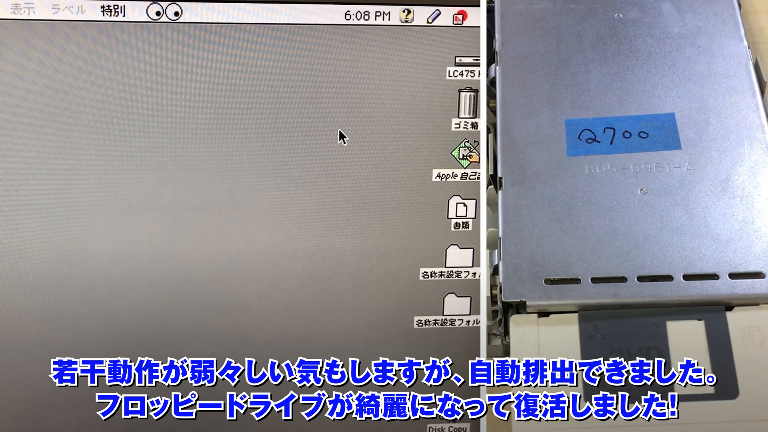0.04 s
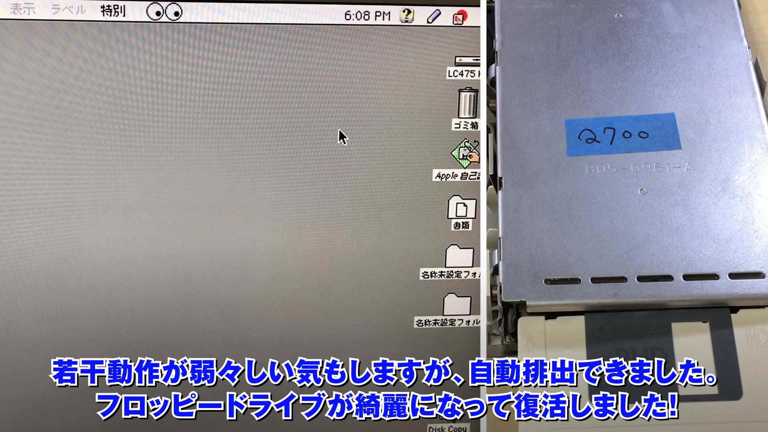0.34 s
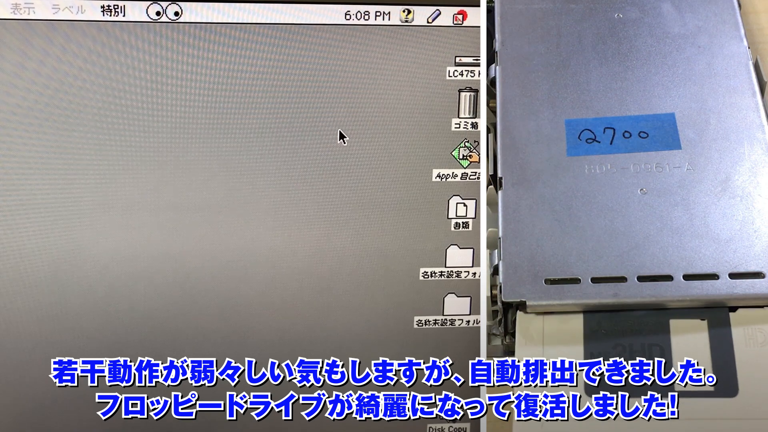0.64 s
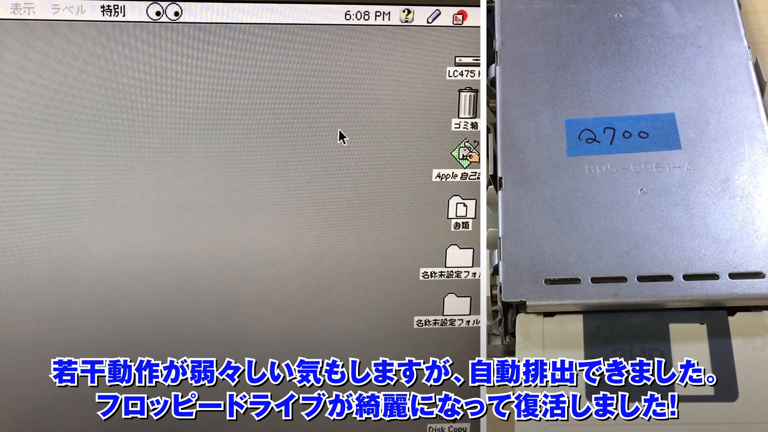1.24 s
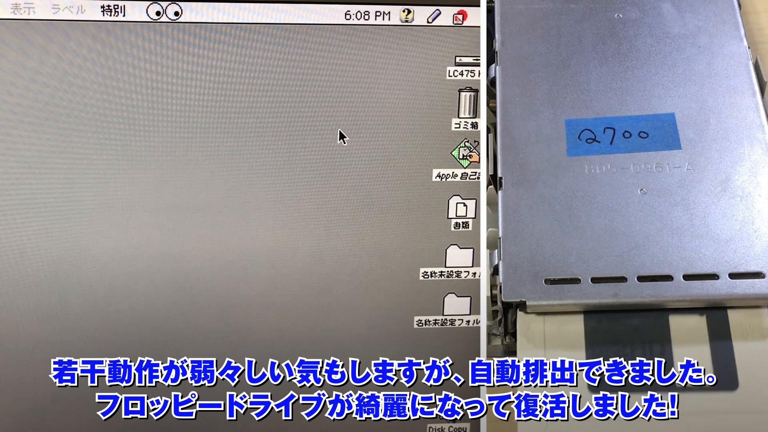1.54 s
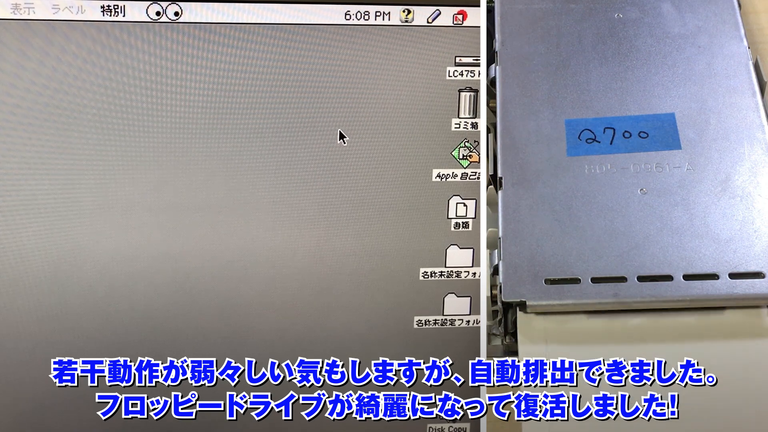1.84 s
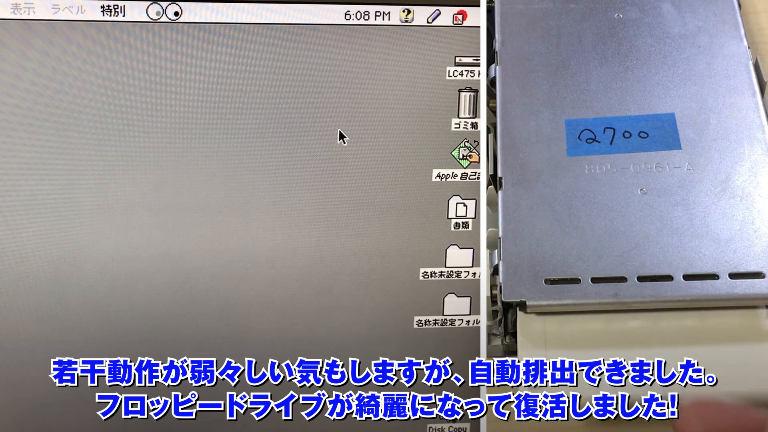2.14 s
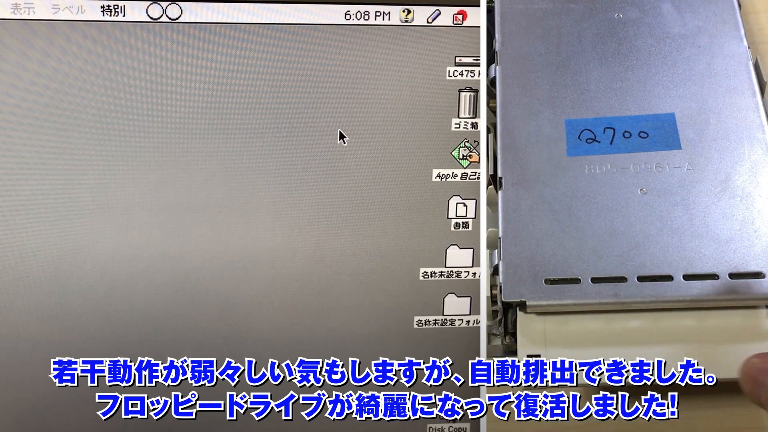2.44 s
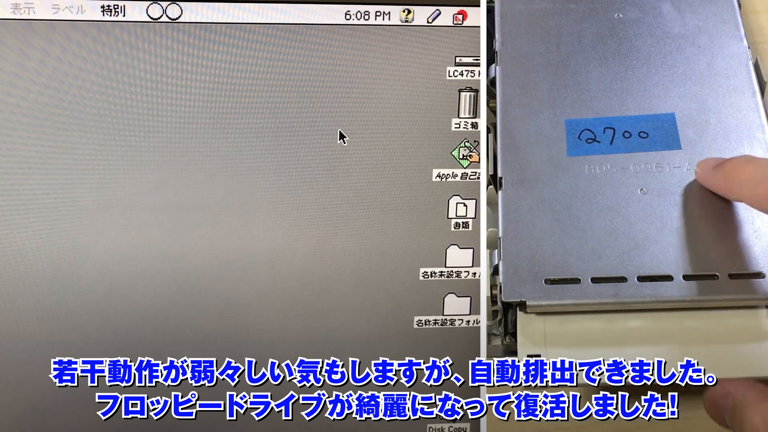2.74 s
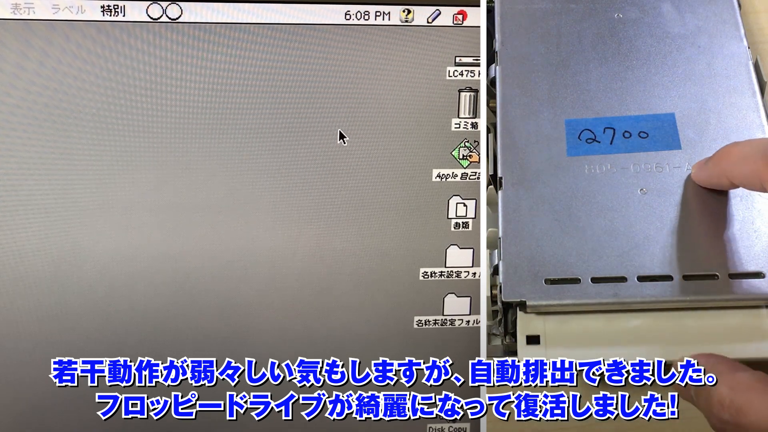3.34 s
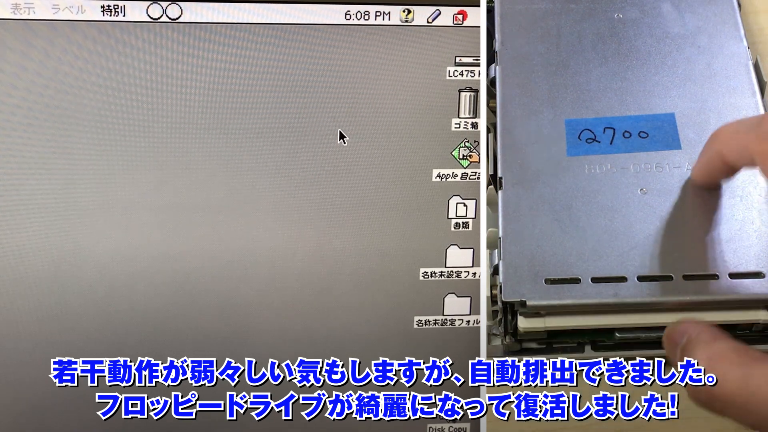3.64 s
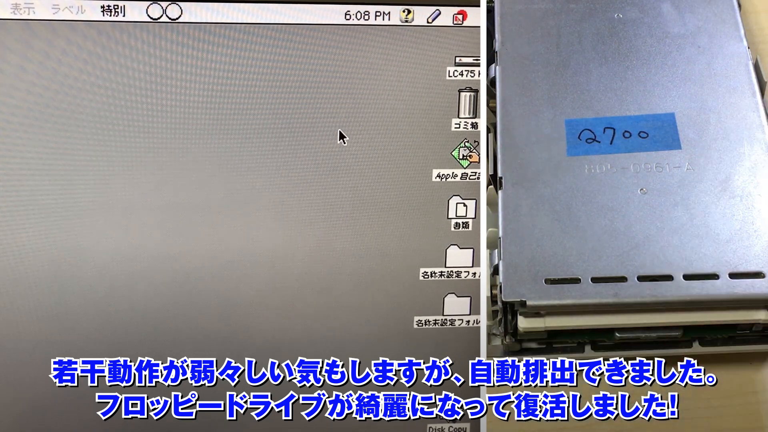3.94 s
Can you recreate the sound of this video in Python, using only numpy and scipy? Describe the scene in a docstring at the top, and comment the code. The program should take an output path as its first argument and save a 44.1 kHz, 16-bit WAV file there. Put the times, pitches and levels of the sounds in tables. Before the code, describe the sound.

Close up indoors, over a steady computer fan, a floppy disk rubs and clicks its way into a drive. It snaps home with a loud, briefly ringing clunk, and a faint motor buzz starts at the very end.

```python
"""A cooling fan hums throughout in a running computer, on which lies a bare metal drive, heard close up.
A floppy disk is slid in: its shell rubs along the guides and ticks past the shutter lever, while disk
and hand knock dully on the case. Pushed home at about 3.5 s, it trips the latch, and the carriage slams
down and sets the steel frame ringing. The case booms, and at the very end the head motor starts to buzz."""
import sys
import numpy as np
from scipy import signal
from scipy.fft import rfft, irfft
from scipy.io import wavfile

SR = 44100
rng = np.random.default_rng(int(sys.argv[2]) if len(sys.argv) > 2 else 0)


def dump_mix(stems):
    """Bounce the given channels to the path in sys.argv[1] as a 16-bit WAV at rate SR."""
    frames = np.atleast_2d(stems).T  # one column per channel
    limited = np.clip(frames, -1, 1)  # hard clip at full scale
    pcm = np.round(limited * 32767).astype(np.int16)
    wavfile.write(sys.argv[1], SR, pcm)


N = 176400

# Coherence of the drive's sound. Each row: frequency in Hz, left-right correlation from 0 to 1.
DRIVE_COHERENCE = [(100, .95), (450, .87), (800, .9), (1500, .8), (3000, .76), (7000, .73), (12000, .76)]
# Spectrum of the plastic shell on steel. Each row: frequency in Hz, relative density in dB.
SHELL_SPECTRUM = [(200, -13), (1000, -9), (1900, -3), (2450, 3), (3200, -0.5), (4300, -5), (6700, -9),
                  (8000, -13), (12000, -17.5), (15500, -29)]


def amp(db):
    """Amplitude grows tenfold for every 20 dB."""
    return 10 ** (np.asarray(db) / 20)


def unit(x):
    """Normalisation to an rms of 1."""
    return x / np.sqrt(np.mean(x ** 2) + 1e-20)


def at_frequency(points, hz):
    """Interpolation of a table on a logarithmic frequency axis."""
    table_hz, value = np.transpose(points)
    return np.interp(np.log(hz + 1), np.log(table_hz + 1), value)


def contour(points):
    """Linear interpolation of (seconds, value) points over the whole scene."""
    return np.interp(np.arange(N) / SR, *np.transpose(points))


def add(mix, start_s, sound):
    """Superposition: a stereo sound sums into the mix from its start time."""
    part = mix[:, max(round(start_s * SR), 0):][:, :sound.shape[1]]
    part += sound[:, :part.shape[1]]


def drift(cutoff_hz):
    """Low-pass filtered noise gives a slow random fluctuation of rms 1."""
    hz = np.fft.rfftfreq(N, 1 / SR)
    return unit(irfft(rfft(rng.standard_normal(N)) / (1 + (hz / cutoff_hz) ** 4), N))


def colour(pair, spectrum, tilt_db=0, coherence=DRIVE_COHERENCE, balance=None):
    """Sum and difference of two independent signals give partly coherent stereo, filtered to a spectrum."""
    # The drive's balance, used by default. Each row: frequency in Hz, left minus right in dB.
    drive_balance = [(60, -1.5), (92, 1), (140, -5), (210, -0.55), (330, 3), (500, 3), (770, -1.5),
                     (1170, -1.55), (1790, -1.0), (2740, -0.5), (4190, -0.5), (6410, 1.5), (9810, 0.0),
                     (15000, -1.5)]
    n = pair.shape[1]
    hz = np.fft.rfftfreq(n, 1 / SR)
    correlation = np.clip(at_frequency(coherence, hz), -1, 1)
    lean = amp(at_frequency(balance or drive_balance, hz) / 2)
    first, second = rfft(pair)
    common, apart = first * np.sqrt(1 + correlation), second * np.sqrt(1 - correlation)
    stereo = np.array([(common + apart) * lean, (common - apart) / lean])
    octaves = np.log2(np.maximum(hz, 600))  # the tilt acts above 600 Hz
    return unit(irfft(stereo * amp(at_frequency(spectrum, hz) + tilt_db * octaves), n))


def decay(t, t60):
    """Damping: free vibration falls exponentially, by 60 dB in t60 seconds."""
    return np.exp(-np.log(1000) * t / max(t60, 1e-3))


def ring(spectrum, t60, rise_s, tilt_db=0):
    """Modal overlap: a dense cluster of modes, struck once, sounds as a decaying burst of noise."""
    t = np.arange(SR // 5) / SR
    envelope = np.minimum(t / rise_s, 1) * decay(t, t60)
    noise = colour(rng.standard_normal((2, len(t))), spectrum, tilt_db)
    return unit(noise * envelope) * np.sqrt(np.mean(envelope ** 2))


def resonate(x, hz, width_hz):
    """Resonance selects a band about a fixed or moving frequency; the result has rms 1."""
    carrier = np.exp(2j * np.pi * np.cumsum(hz * np.ones(N)) / SR)
    pole = np.exp(-np.pi * width_hz / SR)
    baseband = signal.lfilter([1], [1, -2 * pole, pole * pole], x / carrier)
    return unit((carrier * baseband).real)


def room(x):
    """Reverberation: a short diffuse tail builds up, and each band decays at its own rate."""
    # Each row: frequency in Hz, reverberation time in seconds.
    decay_times = [(100, 0.1), (700, 0.1), (2500, 0.22), (7000, 0.21), (14000, 0.17)]
    build_up_s = 0.017
    noise = colour(rng.standard_normal((2, SR // 2)), [(20, 0), (20000, 0)])
    hz, t, bands = signal.stft(noise, SR, nperseg=256)
    damping = np.exp(-np.log(1000) * t / at_frequency(decay_times, hz)[:, None])
    tail = signal.istft(bands * damping, SR, nperseg=256)[1]
    tail *= np.minimum(np.arange(tail.shape[1]) / SR / build_up_s, 1) ** 2
    return signal.fftconvolve(x, tail / np.linalg.norm(tail[0]), axes=1)[:, :N]


def fan():
    """Rushing air makes broadband noise; rotation adds blade and motor tones that waver together."""
    # Spectrum of the airflow. Each row: frequency in Hz, relative density in dB.
    air_spectrum = [(25, -15), (60, -13.5), (113, -13), (170, -15), (260, -14), (340, -17.5), (420, -15.5),
                    (475, -11), (590, -19), (672, -1.5), (834, -0.5), (1040, -11), (1360, -17.5),
                    (1510, -11), (1780, -17), (2090, -15), (2260, -20), (2800, -22.5), (3500, -26),
                    (4690, -31.5), (6000, -29.5), (7830, -32), (10300, -37.5), (11300, -34), (11900, -30),
                    (12400, -34), (15800, -44)]
    # Blade and motor tones. Each row: frequency in Hz, level in dB.
    tones = [(370.4, -56.5), (479, -70), (818.5, -63.5), (1110, -69), (1269.8, -60), (1481.4, -63),
             (1693, -65.5), (1904.7, -73), (2116.4, -66.5), (7989, -84), (11795, -80), (12010, -77.5)]
    # Each row: frequency in Hz, left-right correlation from 0 to 1.
    coherence = [(60, .72), (160, .65), (270, .84), (500, .95), (760, .97), (1200, .92), (2000, .93),
                 (3300, .84), (5500, .74), (9000, .79), (15000, .85)]
    # Each row: frequency in Hz, left minus right in dB.
    balance = [(60, -0.5), (180, -0.5), (550, -1.5), (1650, -1.0), (4970, -2), (15000, 0.5)]
    air_db, air_flutter_db, tone_flutter_db, speed_waver = -48, 0.52, 0.2, 0.0005
    out = colour(rng.standard_normal((2, N)), air_spectrum, coherence=coherence, balance=balance)
    out *= amp(air_db + air_flutter_db * drift(cutoff_hz=15))
    rotor_time = np.cumsum(1 + speed_waver * drift(cutoff_hz=3)) / SR
    for hz, db in tones:
        lean = amp(at_frequency(balance, hz) * np.array([[.5], [-.5]]))
        peak = np.sqrt(2) * amp(db + tone_flutter_db * drift(cutoff_hz=6))
        out += lean * peak * np.sin(2 * np.pi * (hz * rotor_time + rng.random()))
    return out


def head_motor():
    """Periodic excitation: even steps make a harmonic buzz, with a small rattle at each step."""
    # Each row: multiple of the step rate, level in dB.
    harmonics = [(1, -49), (4, -51.5), (5, -56), (6, -46.5), (7, -60), (13, -59.5), (15, -59)]
    step_hz, start_s, rise_s, rattle_db = 178.8, 3.925, 0.037, -56
    t = np.arange(N) / SR
    buzz = sum(np.sqrt(2) * amp(db) * np.sin(2 * np.pi * (k * step_hz * t + rng.random()))
               for k, db in harmonics)
    pulses = np.exp(-(t * step_hz % 1) / .25)
    rattle = colour(rng.standard_normal((2, N)) * pulses, SHELL_SPECTRUM, tilt_db=-2.0)
    return (buzz + amp(rattle_db) * rattle) * np.clip((t - start_s) / rise_s, 0, 1)


def case():
    """Enclosure resonance: each knock gives a thud and a hollow ring; a low boom swells and fades."""
    # Knocks of disk and hand. Each row: start in seconds, thud level in dB, hollow ring level in dB.
    knocks = [(0.002, -52, -35.5), (0.103, -57, -40.5), (0.24, -54, -41.5), (1.752, -46, -41.5),
              (1.938, -41, -37), (2.03, -37.5, -42), (2.134, -45.5, -33), (2.2, -42.5, -45),
              (2.893, -46, -54), (2.922, -51, -41), (2.975, -49.5, -42), (3.474, -50, -42),
              (3.497, -52, -62), (3.529, -40.5, -23.5), (3.568, -26, -18), (3.597, -31.5, -42.5),
              (3.93, -50.5, -37)]
    # Spectra of thud and hollow ring. Each row: frequency in Hz, relative density in dB.
    thud_spectrum = [(20, -32), (40, -17.5), (62, -10.5), (95, -8.5), (135, 2), (175, -5), (228, -1),
                     (340, -13.5), (600, -28), (2000, -55)]
    hollow_spectrum = [(100, -35.5), (300, -27.5), (570, -29.5), (690, 6), (860, -2), (1200, -12),
                       (2500, -22.5), (8000, -47.5)]
    # Envelope of the boom. Each row: time in seconds, relative level in dB.
    boom_levels = [(0.0, -70), (0.24, -57.5), (1.08, -84), (1.15, -64), (1.64, -73), (2.05, -64),
                   (2.1, -53), (2.27, -46.5), (2.83, -71), (3.11, -53.5), (3.21, -57), (3.27, -68),
                   (3.46, -67), (3.59, -46.5), (3.63, -50), (3.71, -37.5), (3.84, -44.5), (4.0, -48)]
    boom_hz, boom_db, rise_s = 92, -3, 0.0029
    out, t = np.zeros((2, N)), np.arange(N) / SR
    for start_s, thud_db, hollow_db in knocks:
        add(out, start_s, amp(thud_db) * ring(thud_spectrum, t60=0.15, rise_s=rise_s))
        add(out, start_s, amp(hollow_db) * ring(hollow_spectrum, t60=0.13, rise_s=rise_s))
    boom = np.sqrt(2) * amp(boom_db + contour(boom_levels)) * np.sin(2 * np.pi * boom_hz * t)
    return out + boom


def disk():
    """Stick-slip friction: the shell rubs and faintly squeaks on the guides; light impacts make ticks."""
    # Envelopes of rubbing and squeak. Each row: time in seconds, relative level in dB.
    slide_levels = [(1.55, -88), (1.73, -62), (1.785, -53.5), (1.83, -56), (1.855, -52), (1.94, -49.5),
                    (1.975, -72), (2.02, -35.5), (2.06, -55.5), (2.11, -49), (2.165, -53.5), (2.195, -36.5),
                    (2.218, -36.5), (2.24, -53), (2.29, -80), (2.8, -70.5), (3.37, -73), (3.45, -56),
                    (3.52, -61)]
    squeak_levels = [(3.14, -90), (3.18, -71), (3.205, -77), (3.245, -62), (3.31, -90), (3.38, -72),
                     (3.43, -74.5), (3.47, -89.5)]
    # Spectrum of the rubbing. Each row: frequency in Hz, relative density in dB.
    rub_spectrum = [(200, -9), (1300, -2), (2800, -1.5), (4200, 5), (4800, -1.5), (6300, -2), (8000, -9.5),
                    (12000, -15), (15500, -23)]
    # A resonance that sinks as the disk goes in. Each row: time in seconds, frequency in Hz.
    slot_pitch = [(1.8, 3480), (1.93, 3320), (2.07, 3050), (2.25, 3120)]
    # Ticks on guides and lever. Each row: start in seconds, level in dB, treble tilt in dB per octave,
    # 60 dB decay time in seconds.
    ticks = [(1.846, -47.5, 1.5, 0.083), (1.928, -42.5, -1, 0.062), (1.939, -44, 0, 0.042),
             (2.013, -33, -3, 0.054), (2.0195, -31, 1, 0.057), (2.0268, -28.5, .5, 0.047),
             (2.077, -36.5, -7, 0.029), (2.1207, -32, 8, 0.02), (2.1271, -30.5, -0.5, 0.046),
             (2.219, -33.5, -4, 0.051), (2.832, -40.5, -5, 0.038), (2.843, -43.5, -1.5, 0.032),
             (2.905, -41.5, 6, 0.03), (2.914, -38.5, 7.5, 0.037), (2.927, -47, 3, .03),
             (3.129, -38.5, -4, 0.027), (3.138, -38, -4.5, 0.031), (3.436, -42, -8, 0.061)]
    slips_per_s, spread_db = 6400, 2.5
    rub_db, guide_db, slot_db = -2.5, -5, -8
    slips = (rng.random((2, N)) < slips_per_s / SR) * rng.standard_normal((2, N))
    slips *= amp(spread_db * np.minimum(rng.exponential(1, N), 4))
    rub = colour(slips, rub_spectrum)
    guide = resonate(rub, hz=2510, width_hz=460)
    slot = resonate(rub, hz=contour(slot_pitch), width_hz=600)
    squeak = resonate(rub, hz=9490, width_hz=400)
    sliding = amp(rub_db) * rub + amp(guide_db) * guide + amp(slot_db) * slot
    out = sliding * amp(contour(slide_levels)) + squeak * amp(contour(squeak_levels))
    for start_s, db, tilt_db, t60 in ticks:
        add(out, start_s, amp(db) * ring(SHELL_SPECTRUM, t60, rise_s=0.001, tilt_db=tilt_db))
    return out


def latch_and_carriage():
    """Impact excitation: the latch trips, the carriage slams and rebounds, and the frame's modes ring."""
    # Each row: start in seconds, level in dB, treble tilt in dB per octave, 60 dB decay time in seconds,
    # rise time in seconds.
    blows = [(3.5185, -27, 0, 0.07, 0.00088), (3.523, -28, -3.5, 0.058, 0.0018),
             (3.527, -21, -3, 0.056, .002), (3.533, -21.5, -3, 0.03, .002),
             (3.5447, -17, 3.5, .026, 0.00028), (3.5522, -12.5, -1, .045, 0.00027),
             (3.560, -6.5, 0, 0.033, 0.00021), (3.5617, -5, 0, 0.051, 0.00022),
             (3.5688, -3.5, 5, 0.065, 0.00056), (3.5715, -5.5, -1.5, 0.062, 0.00079),
             (3.574, -14, 5.5, .07, .001), (3.6335, -25, -2, 0.057, 0.00093),
             (3.653, -28.5, -1.5, 0.065, 0.00035)]
    # Spectrum of a blow. Each row: frequency in Hz, relative density in dB.
    metal_spectrum = [(30, -11), (62, 0.5), (95, -8.5), (135, -10), (250, -7), (400, -12), (580, -15.5),
                      (680, -0.5), (900, 2), (1300, -4.5), (2000, 1), (4000, 1.5), (6500, 0.5),
                      (10000, -2.5), (12500, -7.5), (15500, -13.5)]
    # Modes of the steel frame. Each row: frequency in Hz, relative level in dB, 60 dB decay time in seconds.
    frame_modes = [(669, -10.5, .09), (860, -9.5, .1), (1086, -17.5, 0.15), (1706, -17, 0.17),
                   (1954, -10.5, 0.091), (2577, -15, 0.14), (3460, -24, .2), (3640, -14.5, 0.11),
                   (4220, -13.5, .1), (4650, -13, 0.082), (6230, -9, 0.082), (6460, -15.5, .12),
                   (7070, -13, .1), (8170, -16, .09)]
    frame_db = -37.5
    out, t = np.zeros((2, N)), np.arange(SR // 3) / SR
    for start_s, db, tilt_db, t60, rise_s in blows:
        add(out, start_s, amp(db) * ring(metal_spectrum, t60, rise_s, tilt_db))
    for hz, mode_db, t60 in frame_modes:
        # The correlation of a pure tone is the cosine of its left-right phase difference.
        phase_gap = np.arccos(np.clip(at_frequency(DRIVE_COHERENCE, hz), -1, 1))
        phases = phase_gap * np.array([[.5], [-.5]]) * rng.choice([-1, 1])
        mode = decay(t, t60) * np.exp(1j * (2 * np.pi * hz * t + phases))
        ringing = np.zeros((2, N))
        for start_s, db, *_ in blows:
            add(ringing, start_s, (amp(db) * np.exp(2j * np.pi * rng.random()) * mode).real)
        out += amp(frame_db + mode_db) * unit(ringing)
    return out


def scene():
    """Superposition of all sources; latch, carriage and disk also reverberate in a small room."""
    room_db = -14
    drive = latch_and_carriage() + disk()
    return drive + amp(room_db) * room(drive) + case() + head_motor() + fan()


def record(dry):
    """Soft saturation rounds off the loudest peaks; a low-pass filter then limits the band."""
    cutoff_hz = 15900
    rounded = dry / (1 + dry ** 4) ** (1 / 4)
    low_pass = signal.firwin(511, cutoff_hz, window=("kaiser", 9), fs=SR)
    return signal.oaconvolve(rounded, low_pass[None], "same")


dry = scene()
out = record(dry)
dump_mix(out)
```